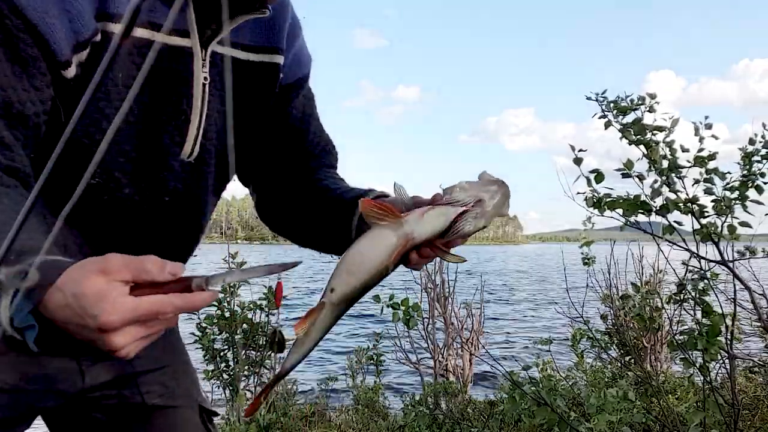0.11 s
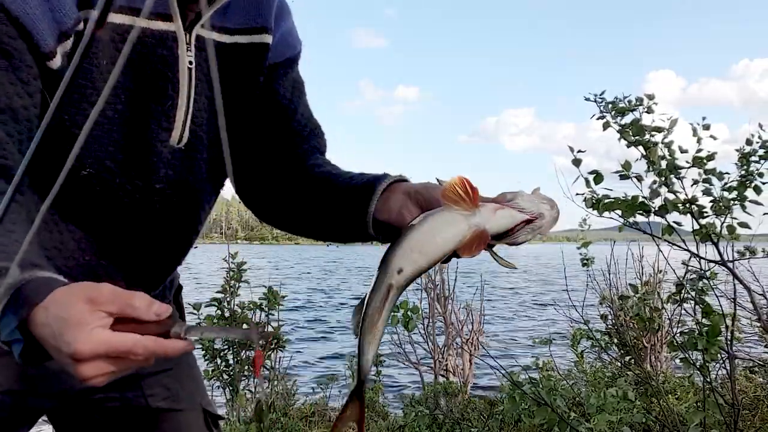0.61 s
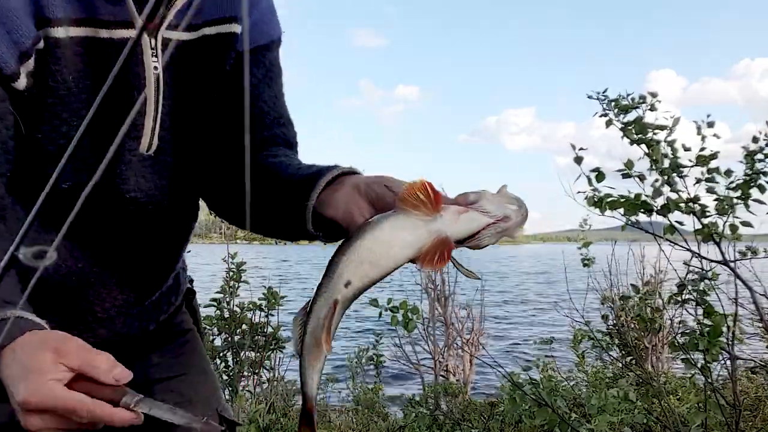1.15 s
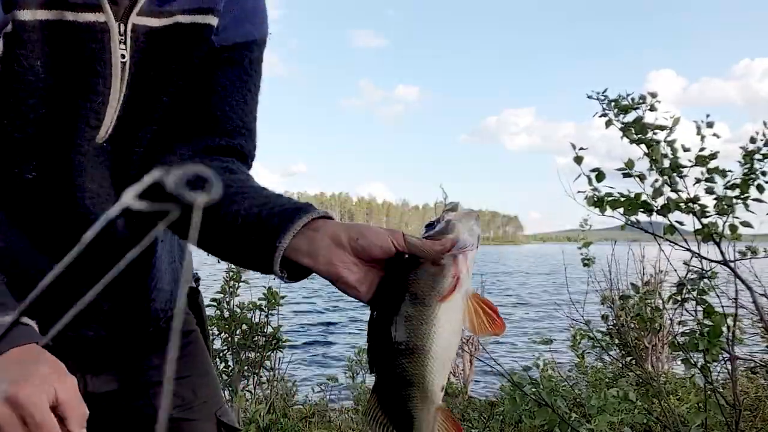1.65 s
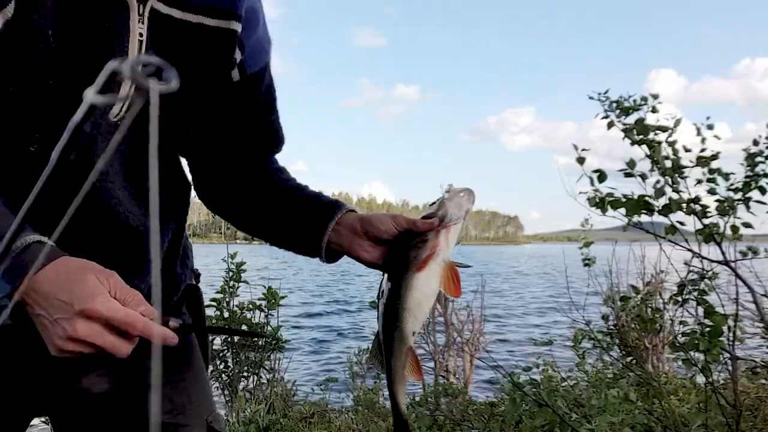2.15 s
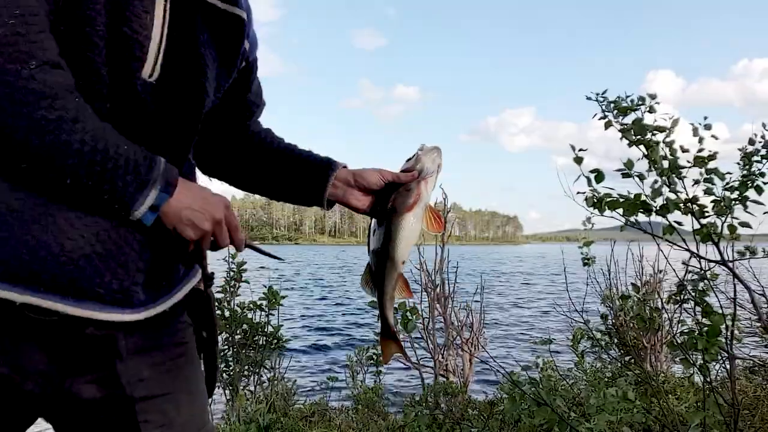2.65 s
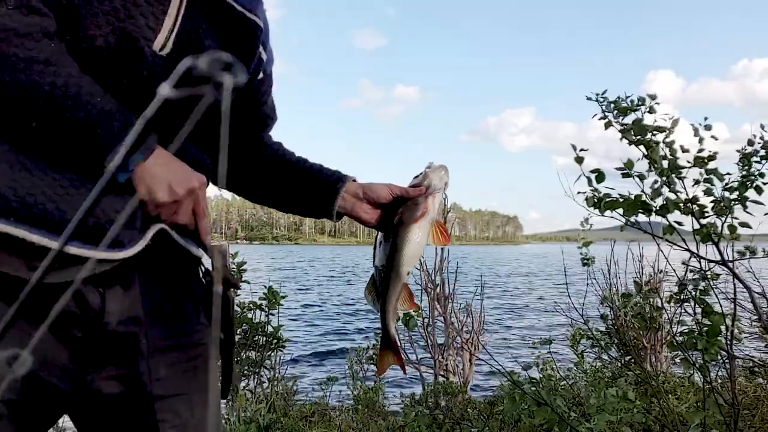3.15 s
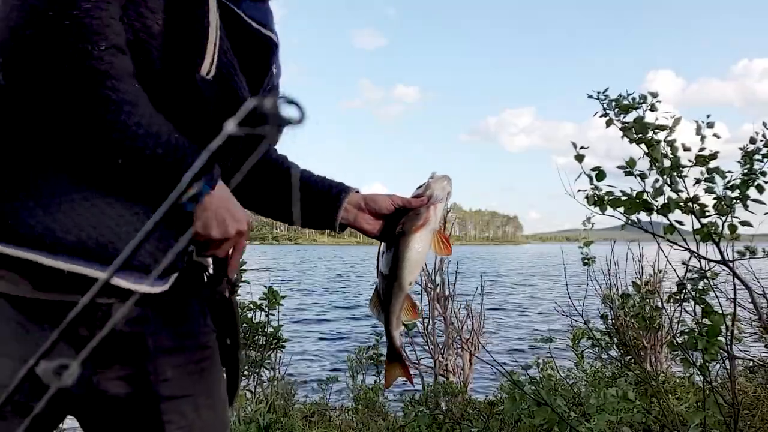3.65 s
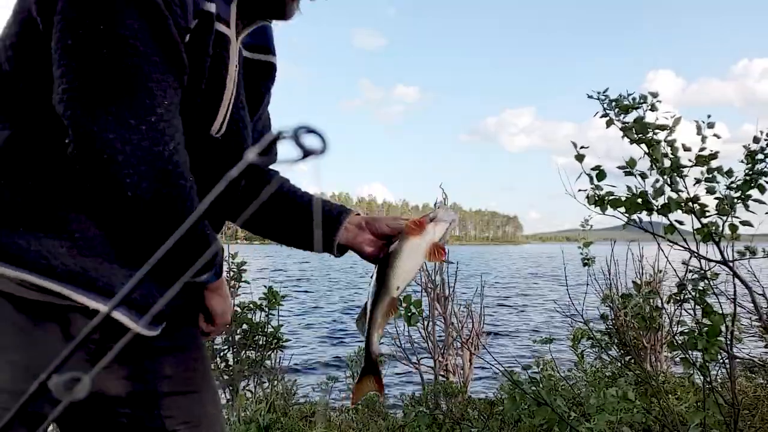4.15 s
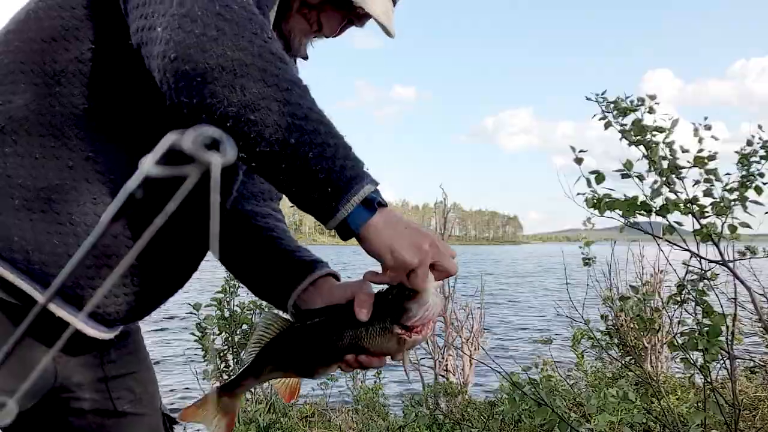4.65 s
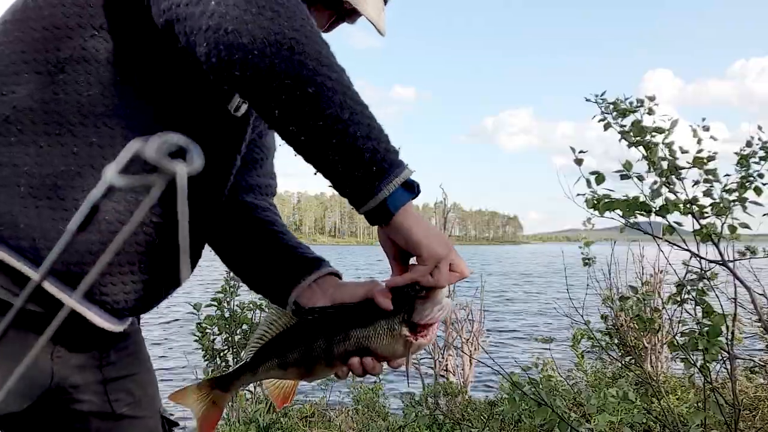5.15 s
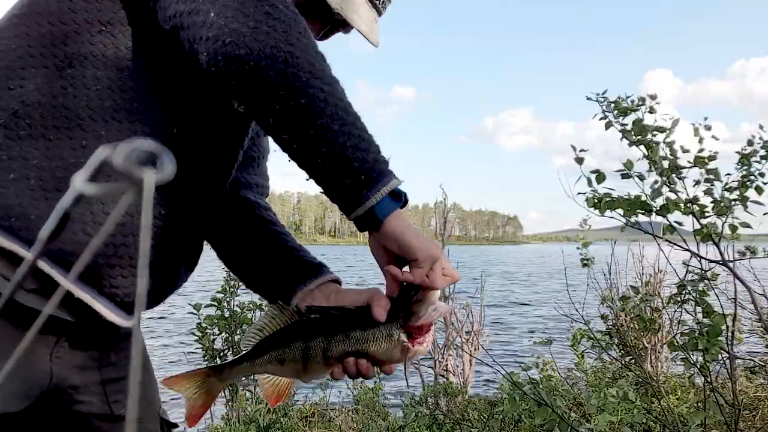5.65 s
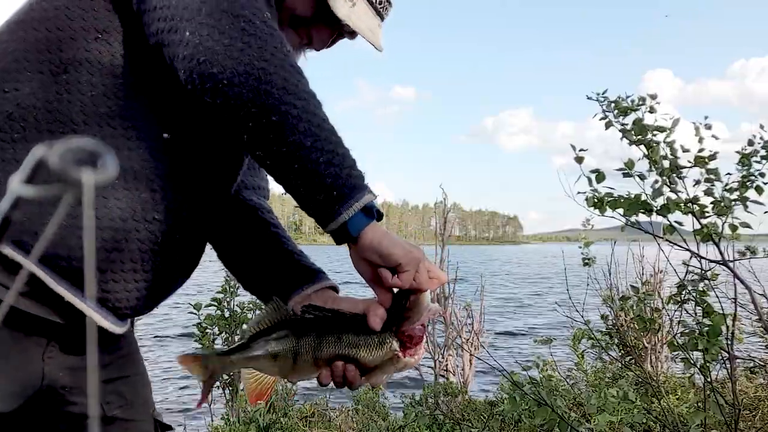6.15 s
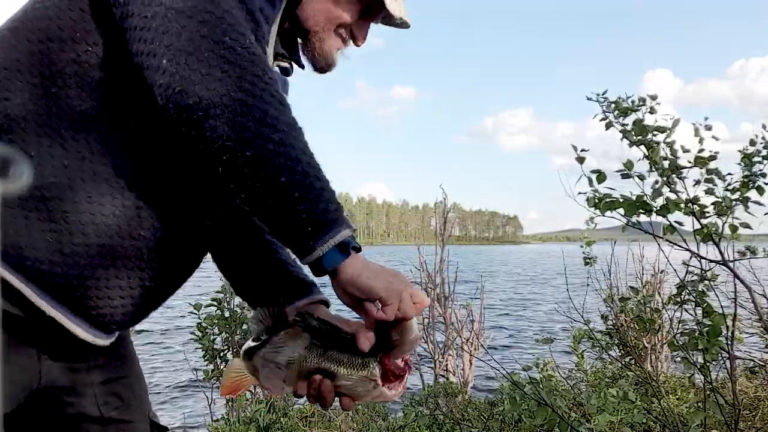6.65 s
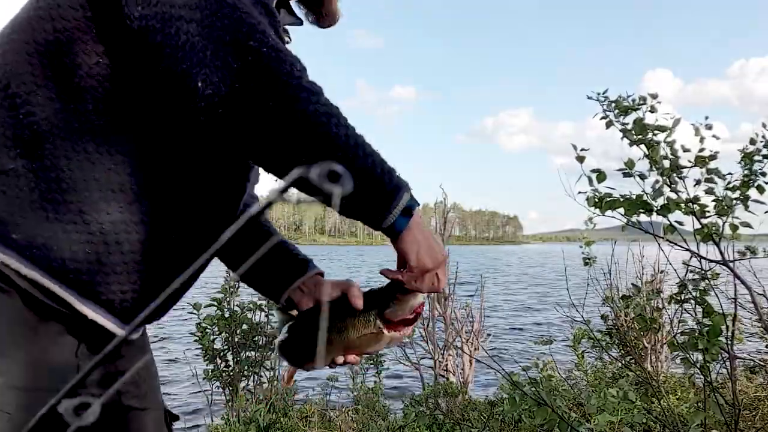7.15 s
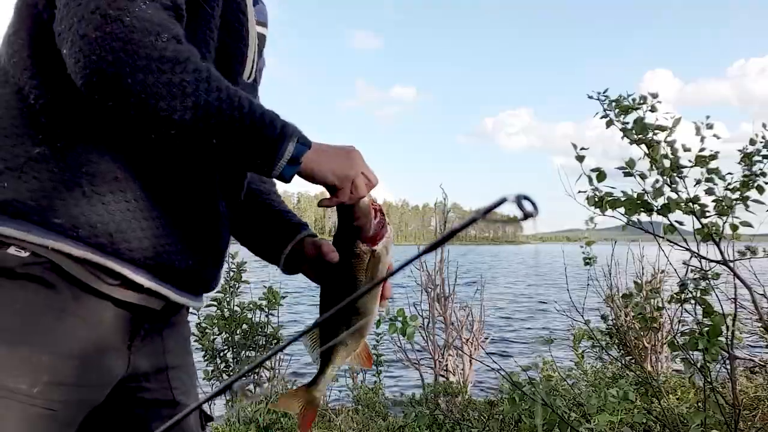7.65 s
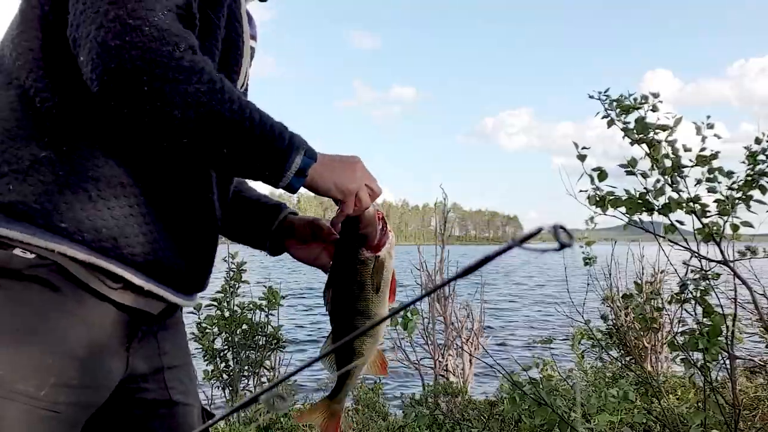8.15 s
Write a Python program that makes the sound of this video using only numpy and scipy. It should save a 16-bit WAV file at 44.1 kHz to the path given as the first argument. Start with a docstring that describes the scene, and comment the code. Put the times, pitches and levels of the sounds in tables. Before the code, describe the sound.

Bubbly lakeside lapping, a twig snap, a knife pushed into a sheath, then sharp wet snaps and squelches as hands work at a fish.

```python
"""A lake shore: small waves lap to the right of a pair of microphones, each a surge of ringing
bubbles, fizzing foam and noise. Close by, a knife is pushed into its sheath and hands work at a fish
with wet cracks and snaps: struck modes, short cracks of noise and stick-slip crackle. A twig snaps on
the left. Behind lie the wash of the far shore and the rising sine whistle of a wader far off."""
import sys
import numpy as np
from scipy import signal
from scipy.fft import rfft, irfft, next_fast_len
from scipy.io import wavfile
from scipy.ndimage import uniform_filter1d

SR = 44100
rng = np.random.default_rng(int(sys.argv[2]) if len(sys.argv) > 2 else 0)


def invert_db(x):
    """Field ratio 10**(x/20) for x, a level in decibels (scalar or array-like)."""
    u = np.asarray(x, float) / 20
    return 10 ** u


def digitize_waveform(pressure):
    """Quantize a signal to 16-bit integers and store it at the path in sys.argv[1].

    Rows of a 2-D input are taken as channels; values are limited to [-1, 1].
    """
    field = np.atleast_2d(pressure).T
    bounded = np.clip(field, -1, 1)
    quanta = np.round(bounded * 32767).astype(np.int16)
    wavfile.write(sys.argv[1], SR, quanta)


N = 365146  # samples

# All levels are relative: mixing, filtering and placing follow.
# Wavelets that slap the bank, churn, then drain:
# start_s, churn_s, gurgle_db, fizz_db, spray_db
LAPS = [(-.03, 0.077, -61, -66.5, -74), (.12, .16, -61, -64, -77), (.335, 0.15, -55.5, -62, -73.5),
        (.51, 0.2, -54.5, -60.5, -74), (.76, 0.1, -55.5, -61.5, -73.5), (.91, 0.093, -62.5, -67.5, -76),
        (1.0, 0.049, -55, -59, -73), (1.09, 0.1, -59, -60.5, -72), (1.18, 0.16, -52.5, -61, -74),
        (1.37, 0.11, -54.5, -62, -82), (1.44, 0.13, -53, -61, -74), (1.56, 0.13, -56, -63, -70),
        (1.7, 0.28, -52.5, -56.5, -69), (2.0, 0.085, -53, -54.5, -66.5), (2.13, 0.016, -51.5, -52.5, -67),
        (2.21, 0.093, -51.5, -57, -71), (2.31, 0.18, -52.5, -67, -72.5), (2.38, 0.19, -46.5, -51, -63),
        (2.62, 0.17, -47, -52, -64), (2.8, 0.18, -49, -53.5, -68), (3.03, 0.16, -48, -51.5, -65),
        (3.27, 0.2, -61, -65.5, -77), (3.46, 0.18, -61.5, -68.5, -78), (3.92, 0.022, -58.5, -60.5, -75),
        (4.07, .13, -57, -59.5, -74), (4.27, 0.1, -60.5, -64, -80), (4.42, 0.012, -77, -64, -83),
        (4.53, 0.02, -66, -64.5, -77), (4.92, 0.13, -91, -77, -82), (5.08, 0.057, -76.5, -70, -90),
        (5.18, 0.045, -65, -66, -83), (5.37, 0.021, -66.5, -66, -80), (5.46, 0.1, -67, -70.5, -90),
        (5.57, 0.15, -58, -59.5, -75.5), (5.76, 0.018, -75, -77, -75), (6.7, 0.1, -56, -57, -69),
        (6.86, 0.077, -54.5, -59, -71.5), (6.99, 0.12, -53, -58, -70.5), (7.18, 0.026, -55, -58, -74),
        (7.28, 0.22, -56, -64, -76.5), (7.57, 0.058, -58.5, -60, -71.5), (7.7, 0.2, -58.5, -60, -70.5),
        (7.92, 0.23, -52.5, -57, -68.5), (8.16, 0.11, -56, -60, -73.5)]
# Brief puffs of fine spray: start_s, length_s, level_db
PUFFS = [(.35, 0.018, -68), (.622, 0.014, -63), (1.24, 0.046, -67.5), (1.408, 0.0061, -57),
         (1.735, 0.046, -60.5), (7.96, 0.018, -70)]
# Gurgle, fizz and spray between wavelets: level_db of each
CALM_DB = (-81, -76.5, -93)


def water():
    """Superposition of surges: bubbles and wash gurgle, foam fizzes, single drops stand out."""
    laps = [surges(LAPS, column, rise_s=0.015, sag_db=-1, fall_db=91.5, swell=0.13) for column in (2, 3, 4)]
    gurgle, fizz, spray = (np.hypot(lap, invert_db(db)) for lap, db in zip(laps, CALM_DB))
    spray = np.hypot(spray, surges(PUFFS, column=2, rise_s=0.0035, sag_db=13, fall_db=306))

    bubbles = grains(750, 3000, per_s=1000, spread_db=3.3, cycles=7.5, glide=0.2, clump_db=2.2)
    foam = grains(3500, 7200, per_s=520, spread_db=6.2, cycles=4.5, glide=0.06, clump_db=1)
    drops = 0.7 * gurgle * evened(microphones(bubbles))
    drops += 0.6 * fizz * evened(microphones(foam))
    drops += glugs() + plops()

    hiss = crackle(per_s=120, spread_db=2.5, burst_s=0.005, steady=0.9, wide=0.65)
    wash = 0.43 * gurgle * evened(band(hiss, index=0))
    wash += 0.58 * fizz * evened(band(hiss, index=1))
    wash += spray * evened(band(hiss, index=2))
    return scatter(drops, share=0.55) + wash


# Drops falling back: start_s, level_db, ring_hz, bright_crack_db (against the ring)
PLOPS = [(0.3378, -48.5, 1490, 10), (0.3466, -41, 1830, -2), (0.3592, -36, 1590, -8),
         (.398, -52.5, 965, -27), (.405, -50, 2100, -20), (0.446, -41.5, 1360, -29),
         (0.527, -39.5, 1990, -14), (0.5793, -49, 1410, -24), (0.761, -45, 2270, 13),
         (0.7855, -45, 1460, -15), (0.9444, -49.5, 1590, -20), (1.0367, -41, 1680, -26),
         (1.0479, -36, 2580, -0.5), (1.0545, -52, 1680, -2), (1.205, -47, 1630, -14),
         (1.229, -43.5, 1490, -27), (1.257, -43, 1480, -21), (1.3, -47, 1600, -25),
         (1.4095, -41.5, 1450, -2), (1.4493, -39, 1470, -6), (1.592, -38.5, 1320, -28),
         (1.9107, -35, 1620, -44), (2.0277, -41.5, 1940, 10), (2.086, -39, 2560, -10),
         (2.151, -36.5, 1580, -2), (2.2954, -42, 1260, -12), (2.298, -43, 2900, -9), (2.432, -42, 1430, -2),
         (2.5065, -34.5, 2200, -8), (2.5447, -32.5, 2420, -9), (2.8155, -35, 3080, -16),
         (2.9037, -40, 1340, -19), (2.9456, -36, 1750, -16), (2.9994, -36, 2530, 4),
         (3.0859, -35, 1900, -29), (3.123, -39, 2250, -3), (3.1577, -36.5, 2150, -1),
         (3.2362, -39.5, 2140, 6), (3.4607, -40.5, 1180, -6), (3.5157, -48.5, 1200, 17),
         (4.1314, -46.5, 1560, -32), (4.1578, -38, 1650, -20), (4.178, -40, 1750, -2),
         (4.318, -47, 2000, -17), (4.728, -56, 1350, -13), (4.835, -58, 1620, -30), (5.078, -53, 1270, -15),
         (5.205, -59, 2250, -19), (5.1904, -52.5, 2510, -4), (5.372, -44, 1510, 2), (5.472, -51, 1960, -2),
         (5.5547, -44.5, 1830, 3), (5.594, -37, 2360, -6), (5.6451, -38.5, 2310, 1),
         (5.6806, -38.5, 2330, 4), (6.865, -37, 1780, -28), (6.9068, -40, 2530, -8),
         (7.001, -43, 1770, -23), (7.05, -41, 1830, -27), (7.114, -48, 1820, -25), (7.1808, -38, 2410, 15),
         (7.222, -40.5, 2230, -7), (7.2566, -47.5, 2060, -23), (7.317, -39, 1420, -20),
         (7.4784, -41.5, 1700, -35), (7.5952, -46, 1740, -9), (7.6964, -47, 2240, -24),
         (7.774, -49, 2280, -13), (7.8545, -40.5, 1560, -7), (7.9868, -45, 1860, -26),
         (7.9972, -43.5, 2400, -21), (8.017, -42, 1900, -23), (8.07, -41.5, 1920, -15),
         (8.165, -45, 1600, -22), (8.2158, -46, 2350, -27)]


def plops():
    """Bubble resonance: each drop rings for a fixed number of cycles, so high ones die sooner."""
    rows = []
    for s, db, hz, bright_db in PLOPS:
        top_db = bright_db - 19.5
        t60 = 21 / hz  # 21 cycles to die by 60 dB
        rows.append((s, db, hz, bright_db, top_db, t60))
    return snaps(rows, rise_s=0.00028, rattle_db=-21.5, tail_db=-28, tail_s=0.21,
                 thin_hz=478, upper_hz=3000, upper_db=-27.5)


# Big bubbles: start_s, level_db, start_hz, end_hz, length_s
GLUGS = [(0.036, -57.5, 800, 1140, 0.013), (1.462, -59, 645, 770, 0.031), (2.262, -52, 902, 1310, 0.027),
         (3.045, -51, 860, 1300, .02), (3.078, -48, 950, 1390, 0.021), (3.269, -46, 788, 1990, 0.042),
         (4.002, -51, 926, 1165, 0.021), (4.858, -61, 725, 1170, 0.029), (5.045, -72, 777, 830, 0.022),
         (5.137, -65, 1480, 1800, .03), (5.325, -65, 1240, 2200, 0.023), (5.415, -57, 880, 680, 0.007),
         (5.563, -55, 1690, 2360, 0.016), (6.271, -58.5, 800, 860, 0.02), (7.057, -56, 800, 1300, .02),
         (7.29, -53.5, 920, 1630, 0.014), (7.401, -58, 694, 1350, 0.035), (7.53, -59, 890, 1300, .012),
         (7.623, -64.5, 680, 1540, 0.042), (7.713, -52, 932, 2000, 0.04), (7.818, -62, 850, 1390, 0.0088),
         (7.752, -46, 1280, 1760, 0.0081), (7.86, -47.5, 1475, 2250, 0.017), (7.921, -57, 690, 1400, 0.032),
         (7.97, -63, 885, 1300, 0.016)]


def glugs():
    """Frequency glide: a big bubble sounds a short sine whose pitch moves, nearly always upwards."""
    out = np.zeros(N)
    for s, db, start_hz, end_hz, length in GLUGS:
        u = np.linspace(0, 1, int(length * SR))
        turns = np.cumsum(start_hz + (end_hz - start_hz) * u ** 1.6) / SR
        envelope = np.sin(np.pi * u).clip(0) ** 0.4
        add(out, s, invert_db(db) * envelope * np.sin(2 * np.pi * turns))
    return out


# Wet cracks under the hands: start_s, level_db, ring_hz, bright_crack_db, top_crack_db, t60_s
CRACKS = [(4.396, -31.5, 3820, -24, -14, 0.0011), (4.442, -41, 4050, -12, -45, 0.0037),
          (4.509, -32, 3690, -10.5, -13.5, 0.007), (4.55, -38.5, 2370, -9, -19, 0.0059),
          (5.8375, -24, 1710, 0, -11, 0.0027), (5.8395, -24, 1760, -4, -12, 0.0037),
          (5.849, -26.5, 3180, 2, -24, 0.0034), (5.865, -19.5, 2530, -16, -24, 0.0031),
          (5.874, -39, 2100, -17, -25, 0.0091), (5.882, -42, 2000, -6, -18, .006),
          (5.905, -35, 2300, -12, -22, .004), (5.9065, -27.5, 2000, -19, -22, 0.013),
          (5.925, -41, 2100, -15, -25, .01), (5.938, -42, 2800, -8, -23, 0.0098),
          (5.953, -23.5, 1940, 4.5, -14.5, 0.0091), (5.971, -36, 1920, -19, -27, 0.0045),
          (6.011, -34, 3720, -12, -11, 0.0038), (6.017, -36, 3000, 4, -6, 0.0037),
          (6.021, -46, 1930, 8, -11, 0.0046), (6.034, -28.5, 1690, -4, -24, 0.0054),
          (6.07, -44, 1810, -11, -25, 0.027), (6.1035, -33, 1900, 5, -5.5, 0.0054),
          (6.135, -40, 2900, -8, -27, 0.013), (6.154, -32, 2080, -7.5, -12, 0.0045),
          (6.199, -39, 2300, 8, -8, 0.0047), (6.212, -51, 2670, -16, -18, 0.01),
          (6.25, -46.5, 2140, 0, -4, 0.0057), (6.321, -19.5, 1560, -2.5, -8, 0.0083),
          (6.36, -37, 1320, -2, -17, 0.015), (6.381, -35, 2980, 0, -5, 0.013),
          (6.452, -45, 2000, 8, -12, 0.0054), (6.457, -28, 2500, -8, -18, 0.0056),
          (6.471, -31.5, 2500, -16, -37, 0.0092), (6.478, -30, 2700, 5, -15, 0.011),
          (6.482, -9, 2910, -17, -11.5, 0.0058), (6.487, -22.5, 1720, -10, -17, 0.0071),
          (6.491, -32, 1820, -11.5, -32, .007), (6.4965, -26, 1900, -18, -31, 0.0074),
          (6.502, -30, 1900, -24, -40, 0.0043), (6.507, -30, 2600, -2, -30, 0.0053),
          (6.515, -22, 3200, -12, -35, .003), (6.52, -28.5, 2460, -6, -39, 0.0051),
          (6.529, -28, 2000, -12, -36, 0.0057), (6.535, -20.5, 1806, -13, -47, 0.0093),
          (6.5495, -28, 3330, -9, -29, 0.008), (6.5525, -33, 3400, -19, -24, 0.0047),
          (6.5535, -29, 1690, -11, -24, 0.0035), (6.556, -18, 1850, -20, -16, 0.006),
          (6.5568, -16, 3400, -19, -13, 0.0019), (6.563, -34, 1800, -11, -25, .008),
          (6.581, -35.5, 1800, -15, -25, 0.0076), (6.592, -40, 2000, -1, -11, .005),
          (6.6, -29.5, 2260, -14, -16, 0.0012), (6.64, -40.5, 2660, -6, -11, 0.0067),
          (6.679, -31, 2250, 2, -5.5, 0.0071), (8.045, -32.5, 1560, -9, -23, 0.0033)]
# Strokes of fingers on wet skin: start_s, length_s, body_db, bright_db
RUB = [(5.83, 0.12, -75, -65), (5.965, 0.024, -68, -61), (6.0, 0.037, -58, -62), (6.05, 0.037, -75, -61),
       (6.1, 0.12, -55.5, -57.5), (6.24, 0.062, -75, -60), (6.33, 0.11, -58, -57.5),
       (6.45, 0.037, -62, -53.5), (6.485, 0.094, -51, -46.5), (6.565, 0.06, -57, -54.5),
       (6.63, 0.06, -63, -60.5)]
# Resonances of the skin: pitch_hz, width_hz, level_db
SKIN_RING = [(1300, 560, -6.5), (1900, 550, 2.5), (3280, 700, -16)]


def hands():
    """Impact and friction: wet cracks excite a ring while fingers stick and slip on the skin."""
    cracks = snaps(CRACKS, rise_s=0.00028, rattle_db=-9, tail_db=-29, tail_s=0.24,
                   thin_hz=1350, upper_hz=3420, upper_db=-11)
    return scatter(cracks, share=0.36) + rubbing(RUB, SKIN_RING, top_db=-8)


# Knocks in the sheath: start_s, level_db, ring_hz, bright_crack_db, top_crack_db, t60_s
SHEATH = [(3.619, -30.5, 1320, -3.5, -23, 0.016), (3.656, -36.5, 1990, -26, -25, 0.036),
          (3.675, -32.5, 2000, -12, -31, 0.014), (3.717, -30, 2050, -20, -34, 0.017),
          (3.726, -41, 1300, -20, -34, .012), (3.734, -18, 1700, -2, -48, 0.011),
          (3.739, -20.5, 1357, -22, -24, 0.0096), (3.7425, -34, 2000, -13, -30, .008),
          (3.7772, -27, 1970, -11, -24, 0.0079), (3.781, -33, 2000, -20, -35, 0.0096),
          (3.79, -35, 1720, -11, -29, 0.013), (3.797, -47, 1350, -22, -35, 0.014),
          (3.803, -41, 1900, -15, -33, .012), (3.81, -43, 1300, -20, -35, .02),
          (3.824, -26.5, 1760, -2, -22, 0.0072), (3.839, -24.5, 1250, 0.5, -29, 0.0091),
          (3.8445, -20, 1990, -5.5, -23, 0.0058), (3.8455, -20, 3470, -10, -26, .005),
          (3.8765, -26, 1790, -9, -40, 0.012), (3.881, -30, 1300, -2, -28, 0.0068),
          (3.892, -33, 4400, -7, -5, 0.0064), (3.933, -44, 1330, -24, -34, 0.0077),
          (3.949, -46.5, 1010, -17, -36, .012), (3.994, -42, 950, -17, -36, 0.016),
          (4.048, -29, 1610, -3, -30, 0.0079)]
# Strokes of the knife in the sheath: start_s, length_s, body_db, bright_db
SLIDE = [(3.63, 0.031, -55, -56), (3.657, 0.05, -47.5, -48), (3.72, 0.009, -57, -45),
         (3.78, 0.032, -54, -58), (3.845, 0.017, -56, -48.5), (3.872, 0.024, -58, -48)]
# Resonances of the sheath's hollow: pitch_hz, width_hz, level_db
SHEATH_RING = [(1320, 260, 1.5), (2000, 240, -0.5), (2900, 500, -11)]


def knife_in_sheath():
    """Impact and friction: the blade knocks and slides, exciting the resonances of the hollow."""
    knocks = snaps(SHEATH, rise_s=0.00035, rattle_db=-2, tail_db=-20, tail_s=0.096,
                   thin_hz=1026, upper_hz=4400, upper_db=-10.5)
    return scatter(knocks, share=0.36) + rubbing(SLIDE, SHEATH_RING, top_db=-13)


# Snaps of a twig: start_s, level_db, ring_hz, bright_crack_db, top_crack_db, t60_s
TWIG = [(1.8395, -27.5, 3200, -10, -24, 0.0097), (1.8418, -20, 2590, -22, -35, 0.005),
        (1.8422, -29, 1000, -33, -44, 0.0081), (1.8475, -32, 1160, -3, -13, 0.016)]


def twig():
    """Impulsive excitation: a few abrupt snaps set short modes ringing."""
    cracks = snaps(TWIG, rise_s=0.00027, rattle_db=-9, tail_db=-31, tail_s=0.015,
                   thin_hz=800, upper_hz=5400, upper_db=-17)
    return scatter(cracks, share=0.11)


# Bird calls: start_s, level_db
BIRD = [(.1, -71.5), (1.09, -72), (2.05, -78), (3.06, -77), (4.04, -71), (5.1, -76), (6.0, -74), (7.2, -75)]
# Pitch curve of one whistle: time_s (from the start of the call), pitch_hz
WHISTLE = [(-.02, 4590), (.04, 4630), (.15, 4740), (.26, 4835), (.33, 4855)]


def bird():
    """Frequency modulation: a thin rising sine, its level fluttering in the air on its way."""
    out = np.zeros(N)
    s, hz = np.transpose(WHISTLE)
    t = np.arange(s[0], s[-1], 1 / SR)
    turns = np.cumsum(np.interp(t, s, hz)) / SR
    envelope = signal.windows.tukey(len(t), 0.25) * np.linspace(0.8, 1.1, len(t))
    tone = envelope * np.sin(2 * np.pi * turns)
    for start, db in BIRD:
        flutter = evened(uniform_filter1d(rng.standard_normal(len(t)), 1500))
        add(out, start + s[0], invert_db(db + 1.8 * flutter) * tone)
    return np.array([out, out])  # straight ahead


# Spectrum of the far shore: pitch_hz, level_db
FAR = [(59, -81), (100, -51), (556, -22.5), (832, -9), (1170, -9), (1570, 1.5), (1900, -6.5), (2500, -14.5),
       (3510, -24.5), (6920, -6.5), (8550, -30), (11500, -22.5), (15800, -33.5)]


def far_shore():
    """Incoherent sum of lapping along the bank: a soft wash that swells, with scattered gurgles."""
    swell = rng.standard_normal(N)
    for _ in range(2):
        swell = uniform_filter1d(swell, 3000)
    wash = evened(colour(rng.standard_normal((2, N)), FAR)) * invert_db(3 * evened(swell))
    gurgles = [grains(600, 2800, per_s=260, spread_db=4.2, cycles=10, glide=0.2, clump_db=2.5)
               for port in range(2)]
    both = wash + 0.9 * evened(colour(np.array(gurgles), FAR))
    tilt = invert_db(np.array([[-1.5], [1.5]]))  # a little louder on the right
    return invert_db(-69) * both * tilt


def grains(lo_hz, hi_hz, per_s, spread_db, cycles, glide, clump_db):
    """Bubble resonance: short rising sines of 20 sizes at random times; like sizes come in clumps."""
    luck = rng.random(N) * SR / per_s
    kind = rng.integers(0, 20, N)
    train = (luck < 1) * invert_db(spread_db * np.minimum(-np.log(luck + 1e-9), 4))  # few loud, many soft
    clumps = rng.standard_normal((N // 256 + 1, 20))
    clumps = uniform_filter1d(clumps, size=10, axis=0)  # smooth in time
    clumps = evened(uniform_filter1d(clumps, size=5, axis=1))  # smooth across sizes
    train *= invert_db(clump_db * clumps[np.arange(N) // 256, kind])
    out = np.zeros(N)
    for k, hz in enumerate(np.geomspace(lo_hz, hi_hz, 20)):
        u = np.arange(int(4 * cycles * SR / hz)) * hz / SR / cycles
        envelope = (1 - np.exp(-6 * u)) * np.exp(-1.5 * u)
        bubble = envelope * np.sin(2 * np.pi * cycles * (u + glide * u ** 2))
        out += signal.oaconvolve(train * (kind == k), bubble / np.linalg.norm(bubble))[:N]
    return out


def snaps(rows, rise_s, rattle_db, tail_db, tail_s, thin_hz, upper_hz, upper_db):
    """Modal impact: a brief ring with an upper mode, a rattle, a wide crack and a lumpy wet squelch."""
    out, t = np.zeros(N), np.arange(4000) / SR
    noise = microphones(rng.standard_normal((len(rows), 4000)))
    body, bright, top = (evened(band(noise, index=k)) for k in range(3))
    lumps = evened(uniform_filter1d(rng.standard_normal((len(rows), 4000)), 130, axis=1))
    upper = invert_db(upper_db) * np.sin(2 * np.pi * upper_hz * t)
    for k, (s, db, hz, bright_db, top_db, t60) in enumerate(rows):
        envelope = (1 - np.exp(-t / (rise_s + 0.027 * t60))) ** 2 * invert_db(-60 * t / t60)
        crack = invert_db(bright_db) * bright[k] + invert_db(top_db) * top[k]
        ring = np.sin(2 * np.pi * hz * t) + upper
        blow = envelope * (ring + invert_db(rattle_db) * body[k] + 0.76 * crack)
        blow *= 1.42 / abs(blow).max()
        tail = invert_db(tail_db + 5 * lumps[k] - 60 * t / tail_s) * (1 - np.exp(-t / 0.011))
        squelch = tail * (body[k] + 0.5 * crack)
        add(out, s, invert_db(db) * (blow + squelch))
    return highpass(out, thin_hz)  # small things radiate no bass


def rubbing(rows, ring, top_db):
    """Stick-slip friction: dense uneven crackle rings in the resonances of what is rubbed."""
    hiss = crackle(per_s=420, spread_db=3.1, burst_s=0.0012, steady=0.2, wide=0.6)
    bright = evened(band(hiss, index=1)) + invert_db(top_db) * evened(band(hiss, index=2))
    body = sum(invert_db(db) * signal.lfilter(*signal.iirpeak(hz, hz / width, SR), hiss) for hz, width, db in ring)
    body_gain, bright_gain = (surges(rows, column, rise_s=0.0076, sag_db=32, fall_db=597)
                              for column in (2, 3))
    return body_gain * evened(body) + bright_gain * bright


def crackle(per_s, spread_db, burst_s, steady, wide):
    """Shot noise: hiss in tiny decaying bursts over a steady part; wide (0-1) makes the ports differ."""
    size = (rng.random(N) < per_s / SR) * invert_db(2 * spread_db * np.minimum(rng.exponential(1, N), 4))
    power = signal.lfilter([1], [1, -np.exp(-1 / (burst_s * SR))], size)
    noise = rng.standard_normal((3, N))
    pair = np.sqrt(1 - wide ** 2) * noise[0] + wide * noise[1:]
    return microphones(np.sqrt(power / power.mean() + steady) * pair)


def surges(rows, column, rise_s, sag_db, fall_db, swell=0):
    """Energy addition of surges: each rises, sags (dB/s) while it lasts, then falls (dB/s)."""
    power = np.full(N // 32 + 2, 1e-20)  # one value per 32 samples
    for row in rows:
        start, length, level_db = row[0], row[1], row[column]
        t = np.arange(len(power)) * 32 / SR - start
        db = level_db - sag_db * np.clip(t, 0, length) - fall_db * np.maximum(t - length, 0)
        rise = np.clip(t / (rise_s + swell * length), 0, 1)  # with swell, long ones rise more slowly
        power += (rise * invert_db(db)) ** 2
    return np.interp(np.arange(N) / 32, np.arange(len(power)), np.sqrt(power))


def scatter(x, share):
    """Diffuse scattering: each port adds its own short, shifting echo noise from the bank."""
    t, wet = np.arange(1500) / SR, 0
    for k in range(3):  # three echo patterns fade into one another in turn
        taps = rng.standard_normal((2, 1500)) * invert_db(-60 * t / 0.034) * (t > 0.0005)
        taps /= np.linalg.norm(taps, axis=1)[:, None]
        turn = np.sqrt(2 / 3) * np.cos(2 * np.pi * (3.1 * np.arange(N) / SR + k / 3))
        wet = wet + signal.oaconvolve((x * turn)[None], taps, axes=1)[:, :N]
    return np.sqrt(1 - share ** 2) * x + share * wet


def place(pair, lag, left_db):
    """Diffraction: the left port gets a delay (samples) and a level shift (dB); bass bends round."""
    size = next_fast_len(N)
    hz = np.fft.rfftfreq(size, 1 / SR)
    shadow = invert_db(left_db * hz ** 2 / (hz ** 2 + 600 ** 2))
    delay = np.exp(-2j * np.pi * hz / SR * lag)
    left = irfft(rfft(pair[0], size) * shadow * delay, size)[:N]
    return np.array([left, pair[1]]) * invert_db(-left_db / 2)


# Response of the microphones, thin in the bass: pitch_hz, level_db
COLOUR = [(180, -77), (300, -49), (573, -11), (882, -4.5), (1080, -1), (1950, 2), (3160, -8.5),
          (3730, -10.5), (5200, -10.5), (6890, -9), (8410, -30.5), (11000, -25), (15800, -29)]


def microphones(x):
    """Transducer response: noise and bubbles take the colour of the microphones."""
    return colour(x, COLOUR)


def colour(x, points):
    """Minimum-phase filtering: a causal filter with the spectrum read on a log-frequency axis."""
    hz, db = np.transpose(points)
    grid_hz = abs(np.fft.fftfreq(4096, 1 / SR))
    curve_db = np.interp(np.log(grid_hz + 1), np.log(hz + 1), db)
    log_gain = np.log(invert_db(np.maximum(curve_db, -100)))
    taps = np.fft.ifft(np.exp(np.conj(signal.hilbert(log_gain)))).real[:2048]
    return signal.oaconvolve(np.atleast_2d(x), taps[None], axes=1)[:, :x.shape[-1]].reshape(x.shape)


# Body, bright and top band: low_hz, high_hz
BANDS = [(150, 3200), (3600, 8400), (8400, 16500)]


def band(x, index):
    """Band-pass filtering: keeps the body, the bright or the top band."""
    return signal.sosfilt(signal.butter(4, BANDS[index], "band", fs=SR, output="sos"), x)


def highpass(x, hz):
    """High-pass filtering: takes away the bass at 18 dB per octave."""
    return signal.sosfilt(signal.butter(3, hz, "high", fs=SR, output="sos"), x)


def evened(x):
    """Normalization of energy: scales to rms 1."""
    return x / np.sqrt(np.mean(x ** 2) + 1e-20)


def add(mix, s, sound):
    """Linear superposition: mixes a sound in at time s (seconds)."""
    part = mix[round(s * SR):][:len(sound)]
    part += sound[:len(part)]


def scene():
    """Stereo localization: water and sheath to the right, hands nearly ahead, a twig to the left."""
    mix = place(water(), lag=16.73, left_db=-7.5)
    mix += place(hands(), lag=0.94, left_db=-3.5)
    mix += place(knife_in_sheath(), lag=6, left_db=-5.5)
    mix += place(twig(), lag=-9, left_db=6.9)
    return mix + bird() + far_shore()


def band_limit(x):
    """A steep low-pass at the top of the band."""
    return signal.sosfilt(signal.butter(12, 16940, fs=SR, output="sos"), x)


def record(dry):
    """Linear filtering: a steep wind filter takes the bass; the top is cut off."""
    thin = highpass(dry, 320)
    thin += invert_db(-25) * dry  # a trace of bass leaks past
    low_pass = signal.firwin(255, 15950, window=("kaiser", 6), fs=SR)
    mix = signal.oaconvolve(thin, low_pass[None], "same")
    return band_limit(mix)


dry = scene()
out = record(dry)
digitize_waveform(out)
```